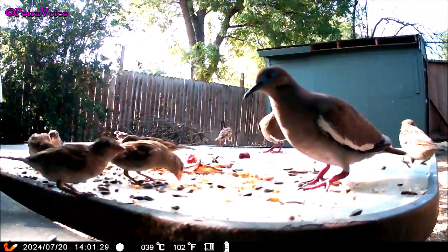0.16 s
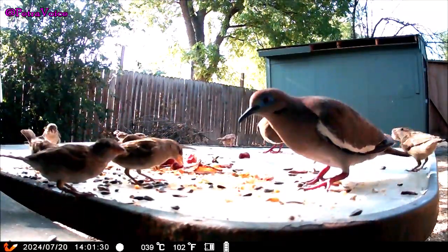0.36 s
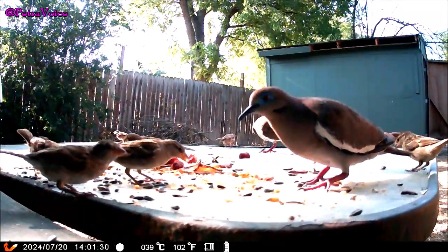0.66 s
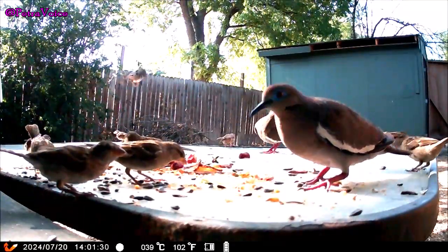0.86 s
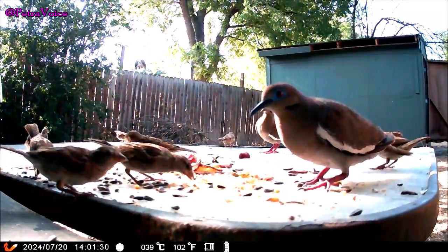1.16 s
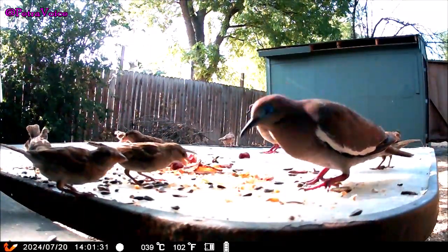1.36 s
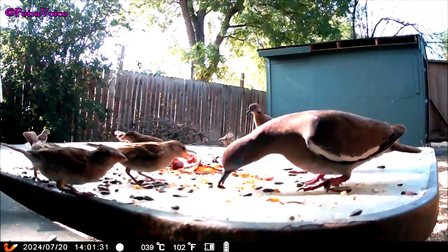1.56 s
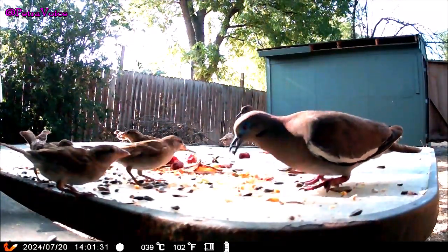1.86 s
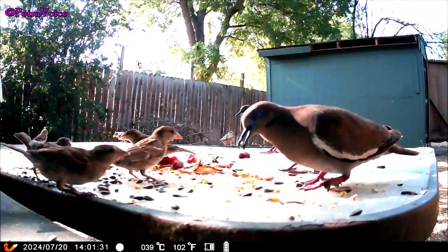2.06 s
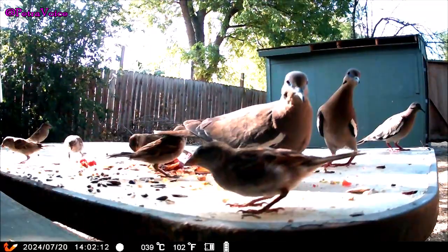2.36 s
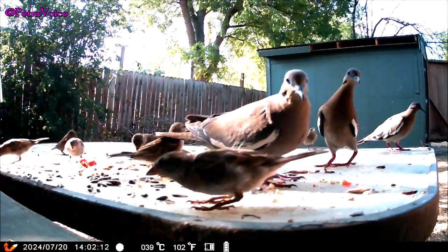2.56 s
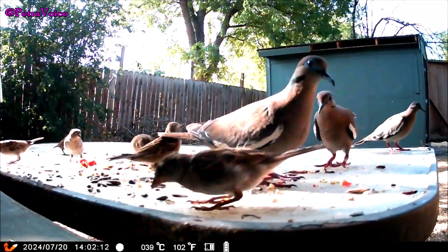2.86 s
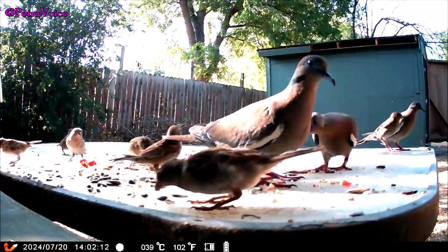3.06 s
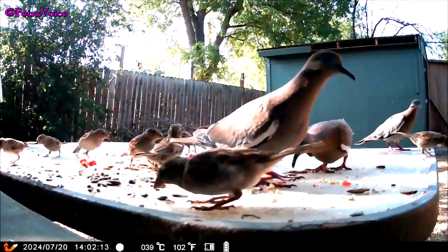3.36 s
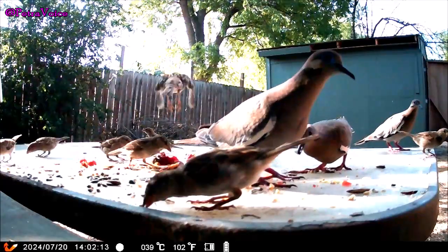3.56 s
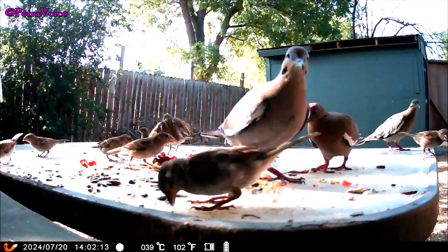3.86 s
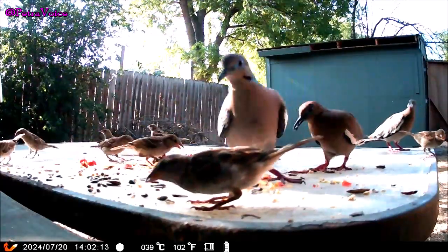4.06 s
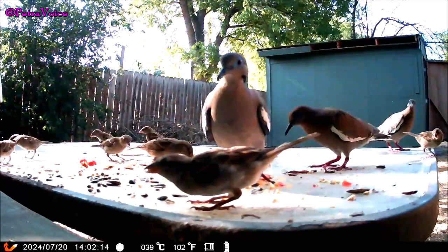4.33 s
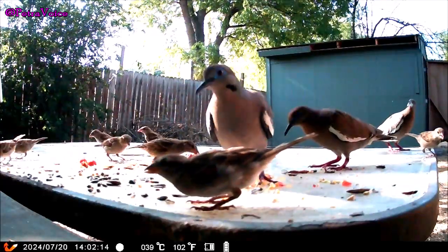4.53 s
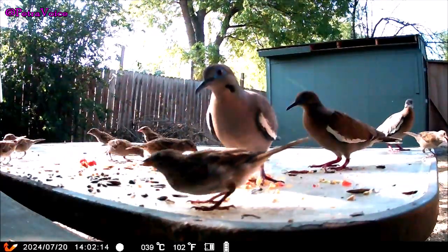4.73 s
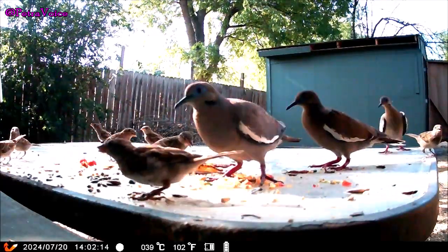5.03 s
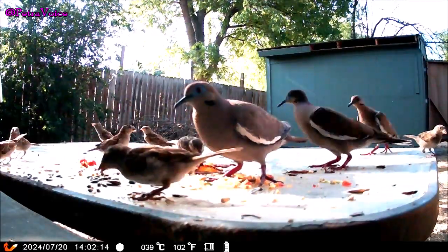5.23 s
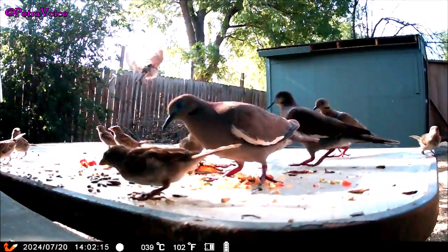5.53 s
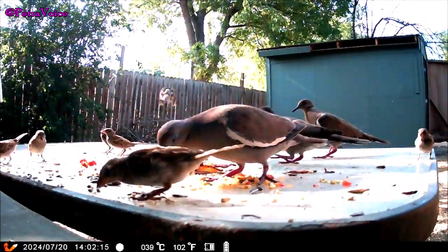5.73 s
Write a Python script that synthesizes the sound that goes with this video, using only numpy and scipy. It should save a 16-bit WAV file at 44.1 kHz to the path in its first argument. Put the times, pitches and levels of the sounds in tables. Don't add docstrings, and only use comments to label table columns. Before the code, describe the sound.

Close, dry beak ticks land irregularly on a seed tray, with faint scuffles of feet in the seed. One hard peck rings the tray around 1.5 seconds. From 2.5 seconds a distant songbird alternates short rising and falling whistles. Insects buzz steadily over a swelling low drone and wind rumble, through a cheap, narrow-band outdoor microphone.

```python
import sys
import numpy as np
from scipy import signal
from scipy.io import wavfile
from scipy.ndimage import uniform_filter1d

SR = 44100
rng = np.random.default_rng(int(sys.argv[2]) if len(sys.argv) > 2 else 0)


def store_pcm(level_fs):
    pcm = np.round(np.clip(level_fs, -1, 1) * 32767).astype(np.int16)
    wavfile.write(sys.argv[1], SR, np.atleast_2d(pcm).T)


def gain_from_db(level_db):
    decades = np.asarray(level_db, float) / 20
    return 10 ** decades


N = 259749


def evened(x):
    return x / np.sqrt(np.mean(x ** 2) + 1e-20)


def along(rows):
    return np.interp(np.arange(N) / SR, *np.transpose(rows))


def add(mix, start_s, sound):
    part = mix[round(start_s * SR):][:len(sound)]
    part += sound[:len(part)]


def resonate(x, hz, width_hz):
    return signal.lfilter(*signal.iirpeak(hz, hz / width_hz, SR), x)


def resonate_twice(x, hz, width_hz):
    return resonate(resonate(x, hz, width_hz), hz, width_hz)


def drift(top_hz):
    t = np.arange(0, N + 256, 256) / SR
    rates_hz = np.geomspace(top_hz / 20, top_hz, 20)
    slow = sum(np.sin(2 * np.pi * (f * t + rng.random())) / np.sqrt(f) for f in rates_hz)
    return np.interp(np.arange(N) / SR, t, evened(slow))


# pitch_hz, level_db, t60_s
PORT_RING = [(3246, 2.5, 0.0065), (4530, -1.5, 0.013), (5620, 1.5, 0.0077)]


def beak_tick(t, treble_db, dry, luck):
    crack = (7150 - 550 * dry, 1 - 2.5 * dry, .012)
    tick = np.zeros(len(t))
    for k, (hz, db, t60_s) in enumerate(PORT_RING + [crack]):
        decay_db = -60 * t / t60_s / (1 - 0.34 * dry)
        detuned_hz = hz * (0.9704 + 0.074 * luck[k])
        tick += gain_from_db(db + treble_db * (k > 0) + decay_db) * np.sin(2 * np.pi * detuned_hz * t)
    return tick * (1 - np.exp(-t / 0.00041))


# pitch_hz, level_db, t60_s
TRAY_MODES = [(2100, -7, .09), (2542, 1, 0.065), (3234, -8.5, 0.058), (3410, -12.5, 0.06),
              (4100, -17, 0.03), (5785, -11, 0.083), (6860, -14, 0.15)]


def tray_ring(t, luck):
    modes = np.zeros(len(t))
    for k, (hz, db, t60_s) in enumerate(TRAY_MODES):
        cycles = hz * (.99 + .02 * luck[k]) * t + luck[-k - 1]
        modes += gain_from_db(db - 60 * t / t60_s) * np.sin(2 * np.pi * cycles)
    rattle = gain_from_db(-5 - 60 * t / .13) * evened(resonate_twice(rng.standard_normal(len(t)), 2800, 1800))
    return (modes + rattle) * (1 - np.exp(-t / 0.00081)) / 2


# start_s, peak_db, treble_db, ring_share_0_to_1
PECKS = [(0.164, -28.5, -17, 0.11), (0.2115, -35, -15, 0.1), (0.2281, -35, -11, 0.04),
         (0.2494, -51, -11, 0.45), (0.2548, -44.5, -8.5, 0.2), (0.4638, -44, -19, 0.17),
         (0.5815, -39.5, -12, 0.1), (0.719, -44.5, -16, 0.43), (0.8538, -55, 3.5, 0.16),
         (1.4617, -22.5, -9.5, 0.25), (1.827, -41.5, -20, 0.22), (1.9848, -48.5, -14, 0.62),
         (2.05, -46.5, -14, 0.24), (2.1862, -49, -10, 0.67), (2.2409, -60, -2, 0.5),
         (2.537, -47.5, -8.5, 0.44), (3.2087, -41.5, -21, 0.08), (3.5867, -32.5, -16, 0.11),
         (4.3982, -32.5, -12, 0), (4.546, -42.5, -11, 0.13), (4.6806, -44.5, -12, 0.2),
         (4.8664, -30.5, -14.5, 0.01), (4.979, -50.5, -9, 0.53), (5.436, -41.5, -18, 0.15),
         (5.732, -47.5, -7, 0.4), (1.021, -46, -11, 0.2)]


def pecks(full_ring_share=0.23, knock_hz=1144, knock_db=-32, knock_t60_s=.04):
    out, t = np.zeros(N), np.arange(6000) / SR
    knock = gain_from_db(knock_db - 60 * t / knock_t60_s) * np.sin(2 * np.pi * knock_hz * t)
    lucks = rng.random((len(PECKS), 2 * len(TRAY_MODES)))
    for (start_s, peak_db, treble_db, ring), luck in zip(PECKS, lucks):
        ring = np.clip(ring, 0, 1)
        dry = max(1 - ring / full_ring_share, 0)
        tick = beak_tick(t, treble_db, dry, luck)
        add(out, start_s, gain_from_db(peak_db + 4.5) * (tick + ring * tray_ring(t, luck) + knock))
        rebound = gain_from_db(peak_db + 9) * ring * resonate(tick, 3000, 1500)
        for later_s, share in ((.006, 1.2), (.017, .6)):
            add(out, start_s + later_s, share * rebound)
    return out


# start_s, length_s, level_db, centre_hz, width_hz
SCUFFLES = [(.1, 0.05, -55, 3020, 1200), (0.166, 0.12, -55.5, 2870, 1310), (0.329, 0.11, -62, 2800, 1210),
            (0.601, 0.049, -59, 2780, 1190), (0.722, 0.028, -62, 2600, 1190),
            (1.003, 0.091, -61, 3000, 1190), (3.63, 0.079, -57, 3464, 500)]


def scuffles(per_s=1600, spread_db=3.0):
    out = np.zeros(N)
    for start_s, length_s, db, hz, width_hz in SCUFFLES:
        luck = rng.random((2, SR // 4))[:, :round(length_s * SR)]
        clicks = (luck[0] < per_s / SR) * gain_from_db(-spread_db * np.log(luck[1] + 0.0094))
        grit = evened(resonate_twice(clicks, hz, width_hz))
        add(out, start_s, gain_from_db(db) * grit * signal.windows.tukey(len(grit), .5))
    return out


def whistle(rows, flutter=.34, flutter_hz=70):
    s, hz, db = np.transpose(rows)
    t = np.arange(s[0], s[-1], 1 / SR)
    lowpass = signal.butter(2, flutter_hz, fs=SR)
    a, b = signal.lfilter(*lowpass, rng.standard_normal((2, SR // 4)))[:, -len(t):]
    path = 1 + flutter * (a + 1j * b) / np.sqrt(flutter_hz * 2 / SR) / 2
    tone = (path * np.exp(2j * np.pi * np.cumsum(np.interp(t, s, hz)) / SR)).real
    return s[0], np.sqrt(2) * gain_from_db(np.interp(t, s, db)) * tone * signal.windows.tukey(len(t), .3)


# start_s, length_s, pitch_hz, level_db, linger (1 = even glide)
RISING = [(2.53, 0.084, 2727, -56.5, 1.0), (2.798, 0.081, 2780, -52.5, 0.82),
          (3.066, .072, 2760, -53.5, 0.95), (3.335, .078, 2722, -51, 1.0), (3.605, .078, 2890, -52.5, 0.8),
          (3.886, 0.07, 2760, -49, 0.8), (4.148, 0.081, 2780, -55.5, 0.84)]
# length_share, pitch_factor, level_db
RISE_SHAPE = [(0, 0.99, -8.5), (.2, 1.02, 1), (.45, 1.1, -6.5), (.75, 1.205, 1.5), (1, 1.215, -2)]
# start_s, top_pitch_hz, level_db
FALLING = [(2.673, 2303, -62.5), (2.938, 2270, -60), (3.202, 2308, -55.5), (3.477, 2263, -55),
           (3.753, 2260, -55.5), (4.02, 2310, -58)]
# time_s, pitch_factor, level_db
FALL_SHAPE = [(0, .95, -6), (.013, 1.0, -1), (.022, .985, 0), (.037, .9, -1), (.062, .77, -4)]


def songbird(fence_s=.053, fence_db=-13.5, echo_db=-3, echo_t60_s=.3):
    dry = np.zeros(N)
    for start_s, length_s, hz, db, linger in RISING:
        shape = np.power(RISE_SHAPE, (linger, 1, 1))
        add(dry, *whistle(shape * (length_s, hz, 1) + (start_s, 0, db)))
    for start_s, hz, db in FALLING:
        add(dry, *whistle(np.multiply(FALL_SHAPE, (1, hz, 1)) + (start_s, 0, db)))
    add(dry, fence_s, gain_from_db(fence_db) * dry[:-SR])
    t = np.arange(SR // 2) / SR
    yard = rng.standard_normal(len(t)) * gain_from_db(-60 * t / echo_t60_s) * (t > .004)
    return dry + gain_from_db(echo_db) * signal.fftconvolve(dry, yard / np.linalg.norm(yard))[:N]


# time_s, level_db
BUZZ = [(0.0, -55.5), (0.64, -60.5), (1.2, -55.5), (2.29, -60), (3.6, -59), (4.5, -61), (4.95, -59),
        (5.38, -62.5), (5.89, -60)]
# centre_hz, width_hz, level_db
INSECT_RINGS = [(2627, 620, -7.5), (3095, 830, -2), (6600, 1300, -10.5)]


def insects(per_s=1500, spread_db=1.0, throb=0.14, throb_hz=63.4, trim_db=-3.5):
    clicks = gain_from_db(spread_db * np.minimum(rng.exponential(1, N), 4)) * (rng.random(N) < per_s / SR)
    clicks *= rng.choice([-1., 1.], N)
    clicks *= 1 + throb * np.sin(2 * np.pi * np.cumsum(throb_hz * (1 + .08 * drift(3.0))) / SR)
    body = sum(gain_from_db(db) * evened(resonate_twice(clicks, hz, width_hz)) for hz, width_hz, db in INSECT_RINGS)
    return gain_from_db(along(BUZZ) + trim_db) * evened(body)


# start_s, length_s, level_db
SWELLS = [(0.233, 0.038, -51.5), (0.613, 0.062, -51), (1.08, 0.18, -53.5), (1.925, .08, -54.5),
          (2.43, .15, -54), (2.975, .82, -53), (4.054, 0.16, -52.5), (4.44, 0.044, -52.5),
          (4.816, 0.047, -51.5), (5.0, 0.47, -57.5)]


def swelling_db(rest_db=-60.5, rise_db_per_s=67, fall_db_per_s=33.5):
    t = np.arange(N) / SR
    level_db = np.full(N, float(rest_db))
    for start_s, length_s, db in SWELLS:
        before_db = rise_db_per_s * np.maximum(start_s - t, 0)
        after_db = fall_db_per_s * np.maximum(t - start_s - length_s, 0)
        level_db = np.maximum(level_db, db - before_db - after_db)
    return level_db


# on_s, off_s, pitch_hz, width_hz, level_db
MOTORS = [
    (0, 5.89, 150, 3, -64),
    (0, 0.81, 222, 3.8, -60),
    (0, 1.58, 337, 7.3, -60.5),
    (0, 2.42, 302.3, 14, -63),
    (3.002, 4.4, 184, 6, -62.5),
    (2.4, 5.89, 1475, 1, -77),
]


def machines(drone_hz=398, drone_width_hz=48, trim_db=-2.5):
    drone = resonate_twice(rng.standard_normal(N), drone_hz, drone_width_hz)
    out = gain_from_db(swelling_db() + trim_db) * evened(drone)
    t = np.arange(N) / SR
    for on_s, off_s, hz, width_hz, db in MOTORS:
        running = np.clip(np.minimum(t - on_s, off_s - t) / 0.28 + .5, 0, 1)
        out += running * gain_from_db(db) * evened(resonate(rng.standard_normal(N), hz, width_hz))
    return out


# pitch_hz, level_db_per_hz
AIR = [(16, -4), (24, -13), (31, -11), (52, -15), (100, -22), (297, -29.5), (390, -29.5), (610, -38.5),
       (1120, -35.5), (1460, -37.5), (1600, -42), (3250, -44), (6830, -49.5), (8010, -51.5)]
# time_s, level_db
TRAFFIC = [(0, -63.5), (2.3, -64), (2.5, -62.5), (4.4, -61.5), (5.89, -63.5)]


def air(level_db=-44.5, patchy_db=0.73, gust_db=0.5, gust_hz=45):
    frames, hz = N // 1024 + 5, np.fft.rfftfreq(4096, 1 / SR)
    a, b, patches = rng.standard_normal((frames, 2049, 3)).T
    patches = evened(uniform_filter1d(uniform_filter1d(patches, size=40, axis=0), size=3, axis=1))
    gusts = evened(uniform_filter1d(rng.standard_normal(frames), size=6))
    f, db = np.transpose(AIR)
    field_db = np.interp(np.log(hz + 1), np.log(f + 1), db)[:, None] + patchy_db * patches
    field_db += gust_db * gusts * np.exp(-hz / gust_hz)[:, None]
    road_db = np.interp(np.arange(frames) * 1024 / SR, *np.transpose(TRAFFIC))
    road_band = np.exp(-np.log((hz + 1) / 900) ** 2 / 0.84)[:, None]
    field_db += (road_db - road_db.mean()) * road_band
    noise = signal.istft((a + 1j * b) * gain_from_db(field_db), nperseg=4096, noverlap=3072)[1][:N]
    return gain_from_db(level_db) * evened(noise)


def scene():
    return (pecks() + scuffles() + songbird() + insects() + machines() + air())[None]


def lean_frames(count=20, most_share=.07, growth=1.6):
    when, share = rng.random((count, 2)).T
    place = ((np.arange(count) + when) / count) ** (1 / growth)
    return list(zip(place * N / SR, most_share * (.4 + .6 * share)))


# time_s, lost_share
THINNED = [(0.347, 0.15), (0.391, 0.15), (0.427, 0.12), (0.623, 0.22), (0.708, 0.14), (1.285, 0.15),
           (1.96, 0.19), (2.115, 0.13), (2.175, 0.13), (2.47, 0.2), (2.778, 0.19), (2.929, 0.2),
           (2.969, 0.15), (3.013, 0.19), (3.157, 0.18), (3.273, 0.17), (3.733, 0.15), (4.144, 0.18),
           (4.183, 0.19), (4.358, 0.15), (4.506, 0.13), (4.658, 0.2), (4.757, 0.18), (4.8, 0.12),
           (4.845, 0.17), (5.06, 0.18), (5.128, 0.14), (5.275, 0.14), (5.443, 0.24), (5.671, 0.14)]
# time_s, low_hz, high_hz
GAPS = [(1.285, 4360, 6100), (2.115, 5150, 6000), (3.271, 4000, 4900), (5.129, 4840, 5860)]


def thin_out(x, greed=3.0, from_hz=700, full_hz=4300, top_hz=7400, kept_db=4.5, half_s=.022):
    hz, t, z = signal.stft(x, SR, nperseg=1024, noverlap=896)
    in_band = hz < 8000
    usual = np.log(np.median(abs(z) ** 2, axis=1) + 1e-20)

    def fade(dt):
        return np.clip(1.86 * abs(dt) / half_s - .5, .13, 1)

    for time_s, share in THINNED + lean_frames():
        frame = abs(t - time_s) < half_s
        edge = fade(t[frame] - time_s)
        power = (abs(z[:, frame]) ** 2).mean(1)
        contrast = uniform_filter1d(np.log(power + 1e-20) - usual, size=4)
        rank = np.searchsorted(np.sort(contrast[in_band]), contrast) / in_band.sum()
        lost = greed * share * np.clip((hz - from_hz) / (full_hz - from_hz), 0, 1) ** 1.5
        silent = (rank < lost) | ((hz > top_hz) & (share > .17))
        z[:, frame] *= np.where(silent[:, None], edge, gain_from_db(kept_db * lost[:, None] * (1 - edge)))
    for time_s, low_hz, high_hz in GAPS:
        frame = abs(t - time_s) < half_s
        z[np.ix_((hz > low_hz) & (hz < high_hz), frame)] *= 0.085 + 0.7 * fade(t[frame] - time_s)
    return signal.istft(z, SR, nperseg=1024, noverlap=896)[1][:N]


# from_s, lead_s
EARLY = [
    (0, .08134),
    (2.367, .04803),
]


def doubled(dry, early_db=-9.0, join_step=.003):
    at = np.arange(N)
    starts_s, leads_s = np.transpose(EARLY)
    take = np.searchsorted(starts_s * SR, at, "right") - 1
    lead = np.round(leads_s * SR).astype(int)[take]
    step = np.zeros(N)
    step[round(starts_s[1] * SR)] = join_step
    return dry + gain_from_db(early_db) * dry[:, np.minimum(at + lead, N - 1)], step


def top_cut(x):
    return signal.sosfilt(signal.butter(12, 15720, fs=SR, output="sos"), x)


def record(dry):
    edge_hz, hiss_db, offset = 7700, -90, -.016
    track, step = doubled(dry)
    band = signal.firwin(161, edge_hz, window=("kaiser", 8), fs=SR)
    narrow = signal.oaconvolve(track, band[None], "same") + step
    hiss = gain_from_db(hiss_db) * rng.standard_normal(N)
    mix = thin_out(narrow[0] + hiss)[None] + offset
    return top_cut(mix)


dry = scene()
out = record(dry)
store_pcm(out)
```